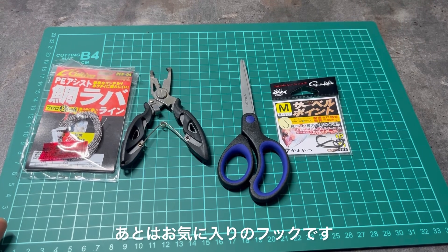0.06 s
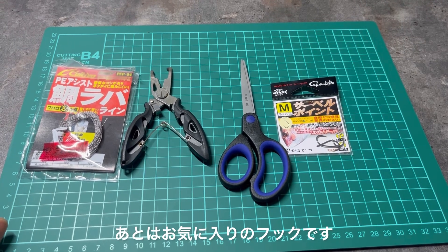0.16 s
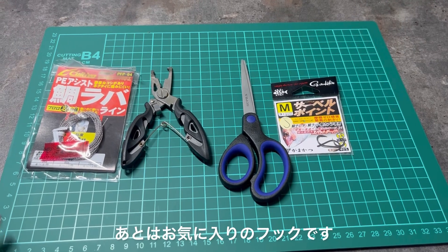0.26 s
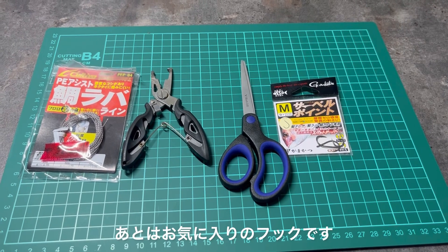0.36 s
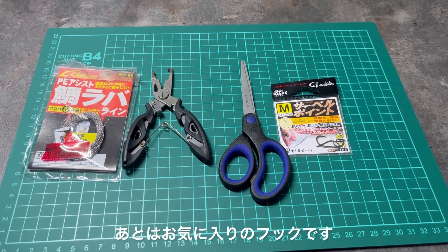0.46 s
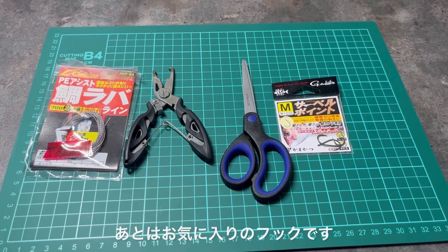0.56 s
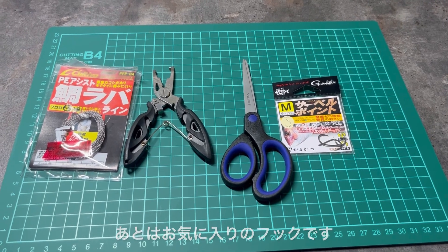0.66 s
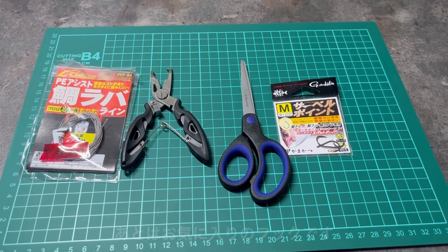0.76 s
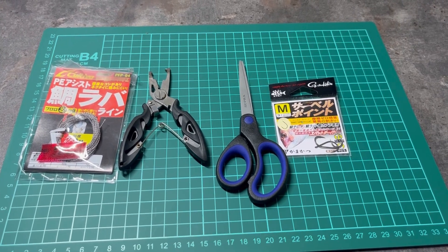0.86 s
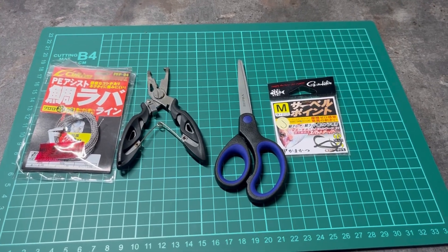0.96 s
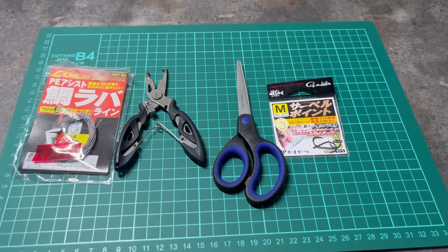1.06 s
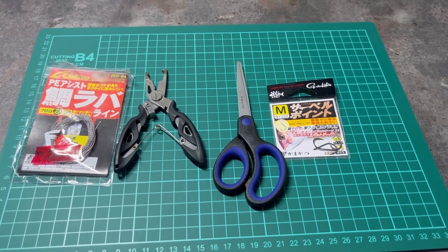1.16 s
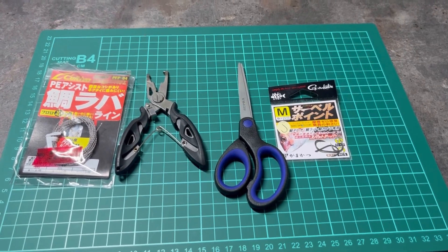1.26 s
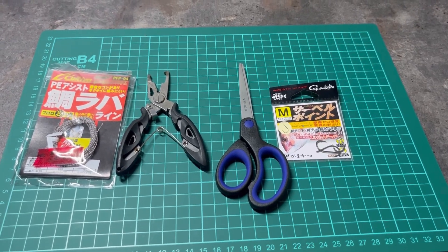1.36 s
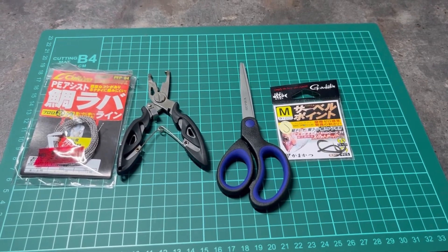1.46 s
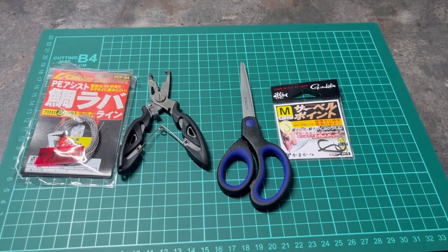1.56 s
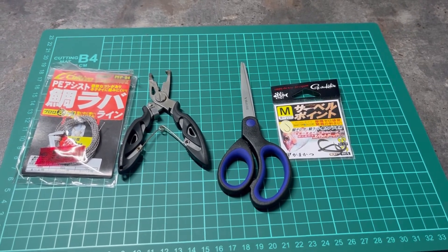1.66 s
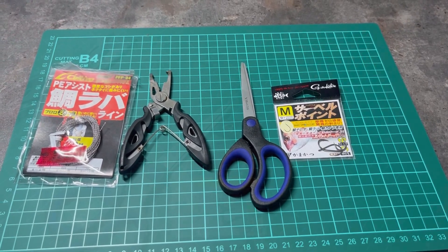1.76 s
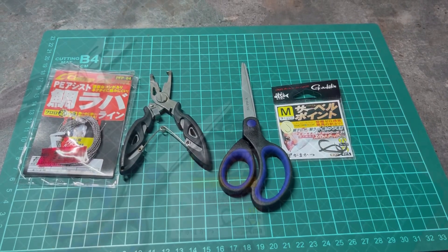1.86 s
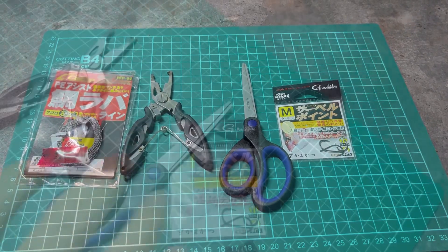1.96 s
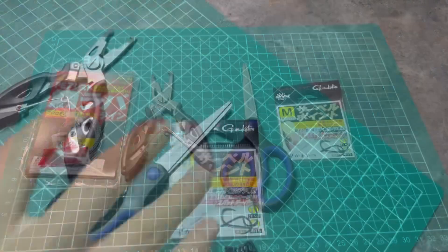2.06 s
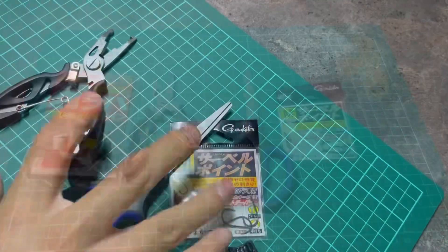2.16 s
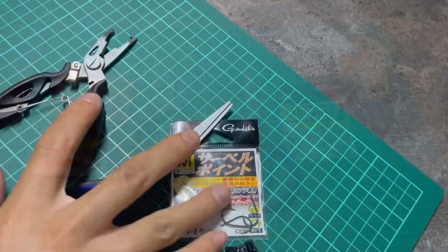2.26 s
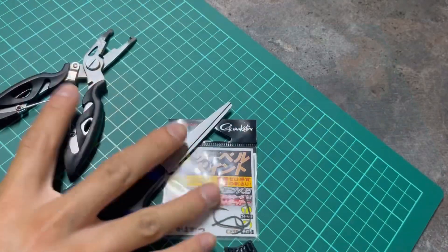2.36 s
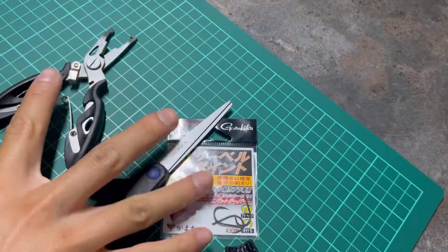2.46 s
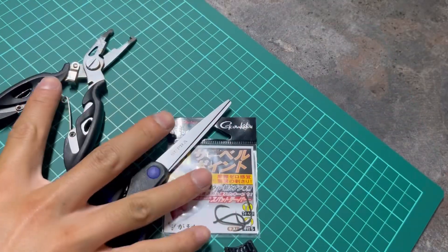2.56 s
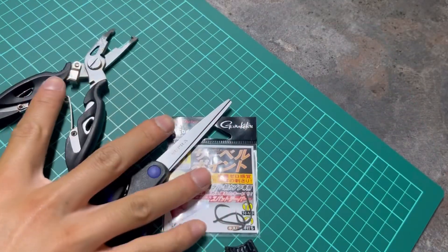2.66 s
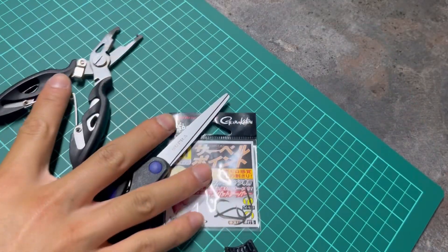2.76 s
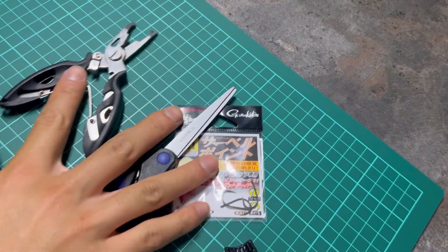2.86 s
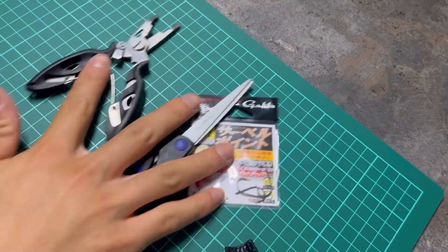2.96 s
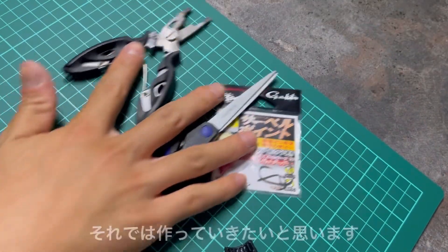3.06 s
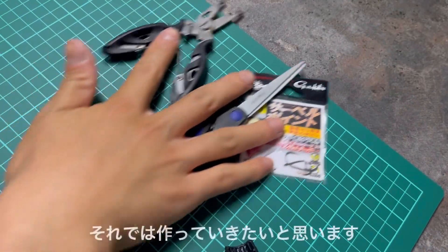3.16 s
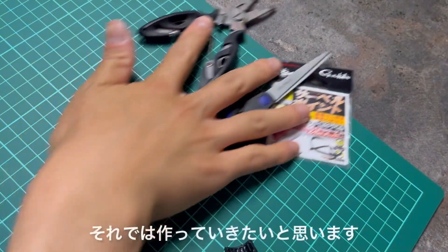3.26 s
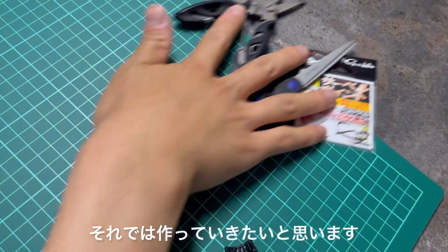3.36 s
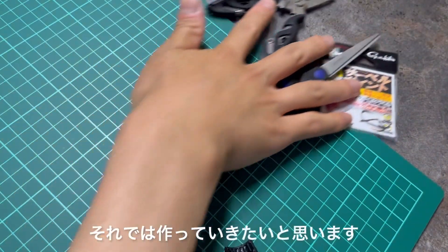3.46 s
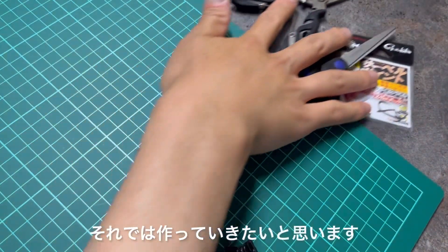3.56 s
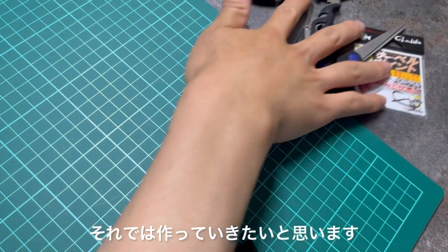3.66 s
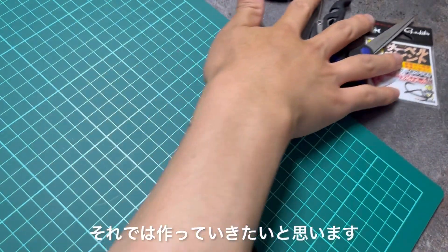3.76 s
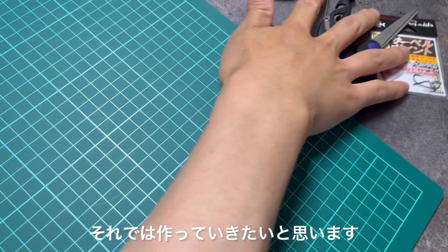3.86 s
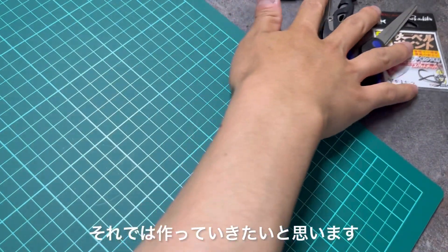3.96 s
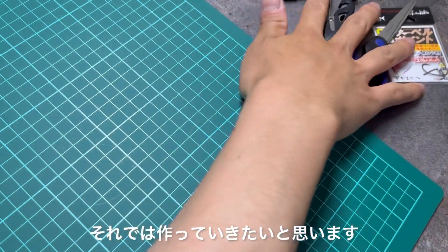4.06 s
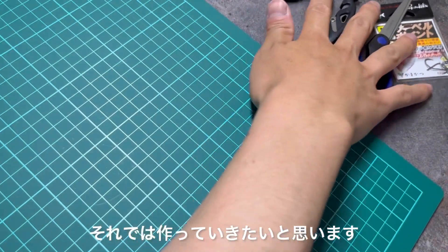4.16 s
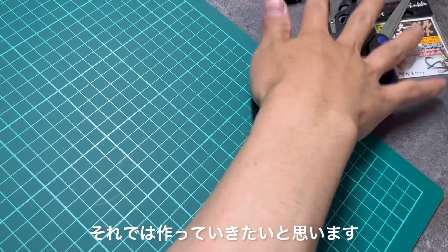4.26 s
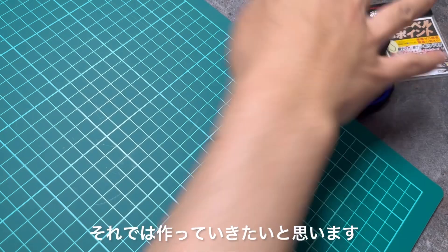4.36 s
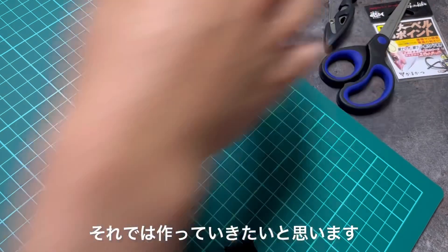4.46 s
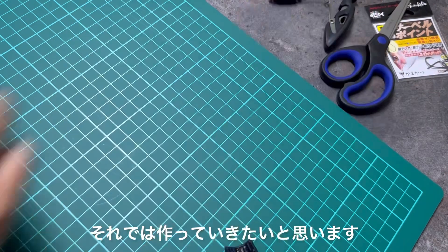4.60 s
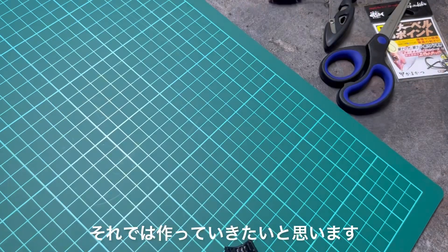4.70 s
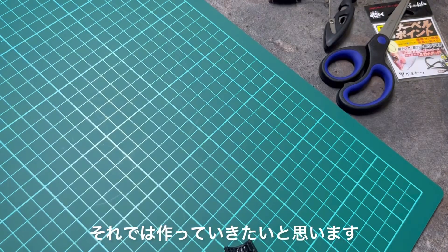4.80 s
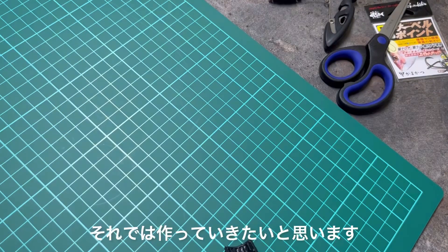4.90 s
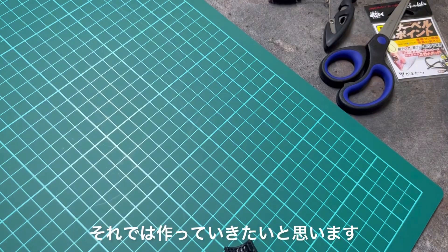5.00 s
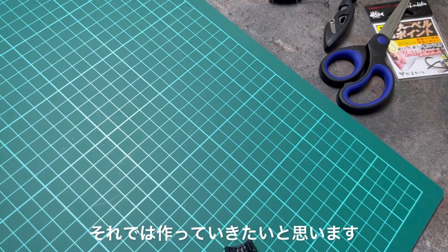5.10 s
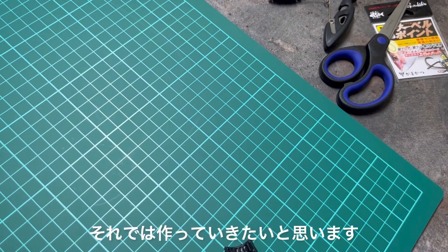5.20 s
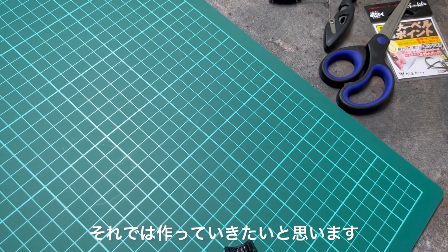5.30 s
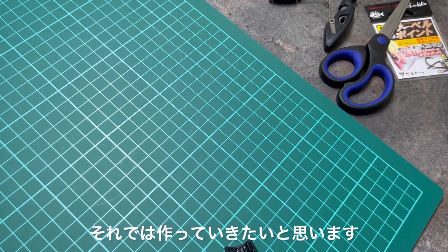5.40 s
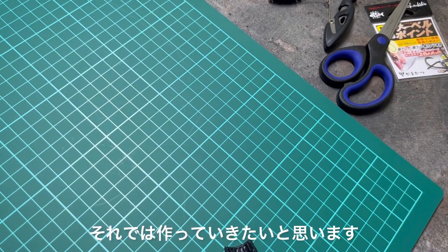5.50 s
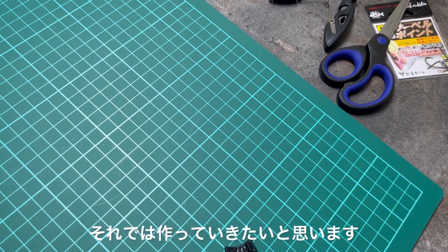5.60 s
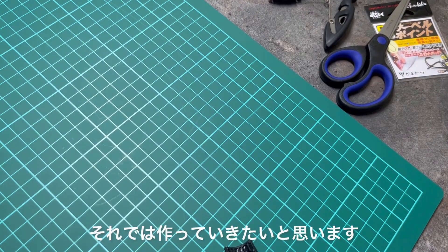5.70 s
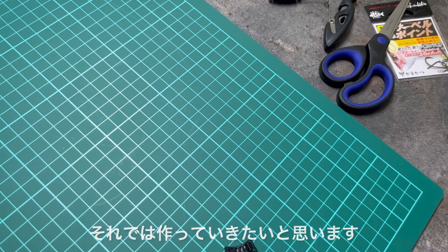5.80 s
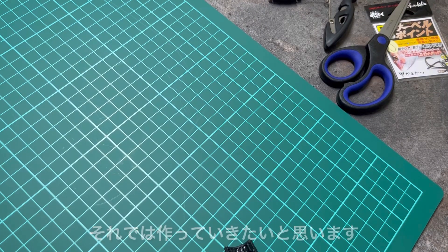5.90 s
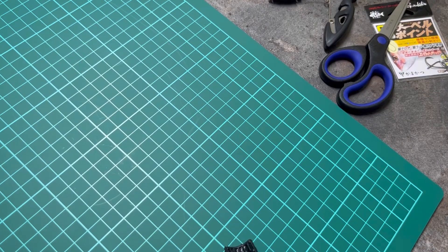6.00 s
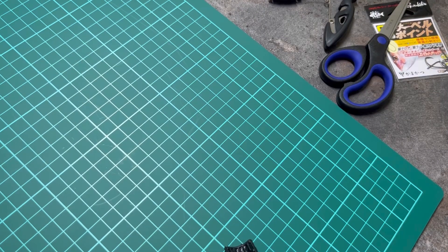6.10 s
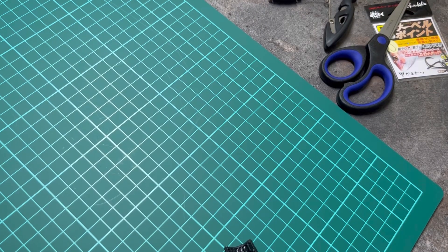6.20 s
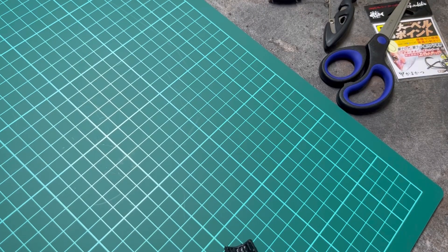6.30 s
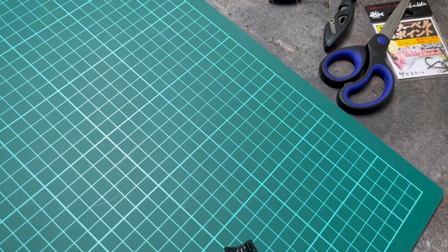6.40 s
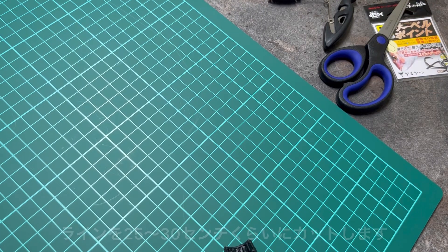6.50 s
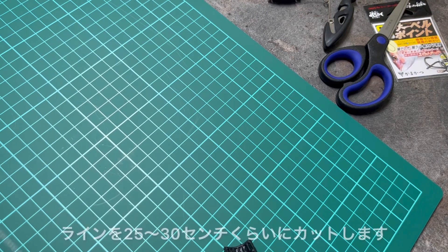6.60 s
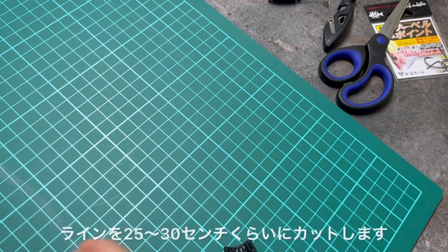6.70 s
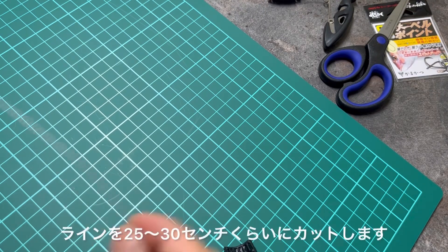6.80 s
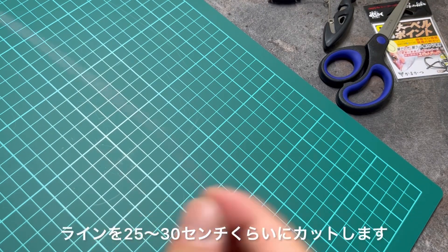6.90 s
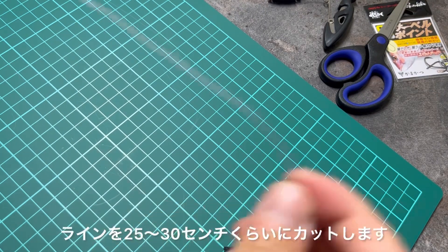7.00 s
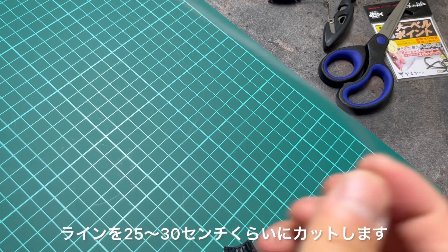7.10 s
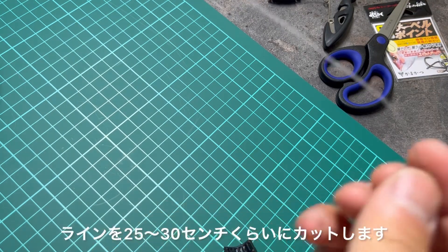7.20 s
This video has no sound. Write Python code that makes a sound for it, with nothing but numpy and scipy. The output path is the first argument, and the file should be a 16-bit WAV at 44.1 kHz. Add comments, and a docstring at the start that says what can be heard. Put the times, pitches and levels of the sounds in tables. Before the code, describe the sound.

A quiet room with faint low rumble and thin air, heard very close in stereo with only a small room tail. The first second is nearly still. From 1.0 to 1.8 s, plastic handles and packets are nudged on the mat: dull hollow knocks, strongest near 1.5, with short dry rubs. From 2.1 to 2.7 come lighter taps and scuffs, with a very soft low hum around 2.1. A slide swells from 2.75, with a knock at 3.15; at about 3.35 the tools tip over the mat edge and the hiss gives way to bright, rapid steel chatter and low table drumming, loudest to 3.8, fading by 4.0. At 4.15 a firm knock and brief scrape end the push. From 4.6 to 6.5, packets crinkle in irregular bursts with crisp ticks, strongest around 5.6 to 5.9, and soft thuds. Then almost only room tone remains to 7.25.

```python
"""Pliers, scissors and plastic packets on a cutting mat, above the rumble of a quiet room.
First they are nudged: friction noise with a grain of separate contacts, and knocks made of decaying tones.
Then a hand pushes all off onto the table top: the slide hisses, excites low table modes and rattles the steel.
Afterwards packets crinkle: bursts of film noise, short decaying sines and soft thuds.
Two close ports hear partly shared sound with a phase lead; a diffuse tail answers for the room."""
import sys
import numpy as np
from scipy import signal
from scipy.fft import rfft, irfft, next_fast_len
from scipy.io import wavfile
from scipy.ndimage import map_coordinates

SR = 44100
rng = np.random.default_rng(int(sys.argv[2]) if len(sys.argv) > 2 else 0)


def file_out(sig):
    """Save sig as 16-bit WAV at sys.argv[1]."""
    # one column per channel
    cols = np.atleast_2d(sig).T
    # limit, then scale
    lim = np.clip(cols, -1, 1)
    pcm = np.round(lim * 32767).astype(np.int16)
    wavfile.write(sys.argv[1], SR, pcm)


N = 319725

# Spectra give relative levels; mode widths and levels apply to one pass of the resonance.
# Event levels come before the gain of their layer.

# sliding speed as drag, weight on the table as drumming, push then last shove: time_s, drag_db, drum_db
PUSH_STROKES = [
    [(2.62, -99, -69.5), (2.754, -78.5, -50.5), (2.848, -66, -43), (3.024, -55, -44.5), (3.126, -55, -47),
     (3.164, -51.5, -26.5), (3.278, -54.5, -42.5), (3.33, -51, -43), (3.368, -49, -37),
     (3.448, -48.5, -29.5), (3.512, -41, -30.5), (3.6, -47.5, -26), (3.638, -44.5, -28),
     (3.706, -48, -27.5), (3.76, -46.5, -27), (3.87, -49.5, -32.5), (3.93, -59.5, -40), (4.05, -77, -58),
     (4.135, -79.5, -49.5)],
    [(4.15, -48.5, -34), (4.228, -70.5, -51), (4.268, -59, -39.5), (4.306, -62, -42.5), (4.336, -73, -46),
     (4.496, -102.5, -77.5), (4.55, -101, -77)],
]
# share of the slide on the bare table: time_s, share (0-1)
BARE_TABLE_SHARE = [(0, 0), (3.5, 0), (3.6, 1), (7.25, 1)]
# bands cancelled by the bare table's echo: centre_hz, width_hz, depth (0-1)
ECHO_DIPS = [(1710, 190, 0.6), (2780, 98, 1), (3560, 67, 0), (4870, 170, 0.81)]
# resonances of the table top: centre_hz, width_hz, level_db
TABLE_MODES = [(86, 100, -14.5), (132, 24, -6), (204, 28, -10), (262.2, 9.1, 2.5), (330.1, 8, 3),
               (372, 90, -10.5), (423, 23, -1), (486.3, 21, -5), (587, 55, -10.5), (652.5, 22, -6.5),
               (765, 64, -14), (1011, 67, -20)]
# resonances of rattling tools: centre_hz, width_hz, level_db
STEEL_MODES = [(3330, 190, -1.5), (4130, 730, -6), (5540, 1600, -12), (10770, 400, -21)]
# resonances of tools dragged flat, passed twice: centre_hz, width_hz, level_db
DRAG_MODES = [(2400, 1400, 4), (3350, 430, 5), (4100, 1000, -4), (5300, 170, -9)]
# spectrum of the mat hiss: frequency_hz, level_db
HISS_SPECTRUM = [(500, -9), (1500, 1.5), (3000, 3), (5000, 5.5), (7500, -0.5), (10500, -1), (13500, -0.5),
                 (14800, -17), (15600, -45)]
# spectrum of the grit under the slide: frequency_hz, level_db
GRIT_SPECTRUM = [(400, -16.5), (800, -3.5), (1300, 0), (1550, -4.5), (1800, -7), (2500, -48.5)]
# steel singing as it slides slowly: centre_hz, width_hz, level_db
SQUEAK_MODES = [(3320, 110, 0), (4200, 120, -7.5), (2510, 80, -7.5)]
# when the steel sings: peak_s, rise_s, hold_s, fall_s, level_db
SQUEAK_SWELLS = [(4.3, .09, .002, 0.15, -55.5), (6.62, .06, .06, .06, -81)]
# single slips of the steel: start_s, level_db, ring_hz, edge_db (edge relative to the slip)
STEEL_SLIPS = [(3.3438, -21.5, 3470, -33), (3.3527, -19, 3460, -31.5), (3.3604, -23.5, 3220, -30),
               (3.3824, -22.5, 3640, -40), (3.3973, -22, 3400, -34.5), (3.411, -22, 3480, -32.5),
               (3.4243, -13.5, 3510, -34), (3.4363, -14.5, 3490, -29.5), (3.442, -23.5, 3510, -29),
               (3.4504, -20, 3700, -29), (3.4605, -21, 3600, -32.5), (3.4693, -15.5, 3660, -32.5),
               (3.4757, -19, 4100, -33.5), (3.4844, -23.5, 3580, -33.5), (3.4925, -20.5, 3620, -32),
               (3.5019, -21.5, 3640, -36), (3.506, -21.5, 4080, -34), (3.5132, -22, 3580, -31),
               (3.5186, -25.5, 3470, -28.5), (3.5285, -26.5, 3700, -30), (3.5456, -24, 3680, -30.5),
               (3.5539, -23, 3740, -27.5), (3.5636, -28.5, 3300, -27), (3.5695, -26, 3700, -29.5),
               (3.6272, -26, 4300, -16), (3.6401, -25, 3750, -14.5), (3.698, -31, 3350, -28.5),
               (3.7537, -26.5, 3320, -13), (3.766, -23.5, 3330, -22), (3.8844, -29, 3400, -22.5)]
# tool tips rung by the chatter, passed twice: centre_hz, width_hz, level_db
TIP_MODES = [(3400, 350, -0.5), (4070, 260, -3), (5380, 230, -3.5)]

# contacts: start_s, level_db, ring_hz, table_db, crack_db (both relative to level), left_over_right_db
KNOCK_EVENTS = [(.316, -59.5, 587, 6, 4.5, 1), (0.992, -47.5, 766, -22, -30, 4),
                (1.037, -50, 680, -9, -34, 4), (1.106, -47.5, 500, -10, -21, -1),
                (1.171, -36.5, 516, -7.5, -32, 7), (1.217, -45, 630, -28, -30, 4),
                (1.429, -46.5, 550, -14, -21, -3), (1.454, -27, 554, -19, -46, 0.5),
                (1.496, -27, 520, -30, -34, -2), (1.579, -34.5, 485, -16, -38, -0.5),
                (1.719, -41, 454, -19, -24.5, 3.5), (1.75, -31, 705, -24, -30, 2),
                (1.779, -39, 1170, -29, -25, -8.5), (2.074, -51, 302, 5, -40, -0.5),
                (2.093, -50, 290, 1, -38, 4.5), (2.118, -52, 397, 10, -29, 6),
                (2.204, -35, 690, -14, -19, 1), (2.295, -55, 536, -20, -3.5, -0.5),
                (2.338, -49, 2730, -29, 5, 11.5), (2.365, -47, 470, -28, -1, -1),
                (2.379, -47, 3000, -20, 1.5, 1.5), (2.39, -43, 490, 1.5, -14, 1.5),
                (2.44, -46.5, 2200, -5, -1.5, 0), (2.531, -36.5, 715, 0.5, -4, 2.5),
                (2.658, -41, 1130, -12, -3.5, 0.5), (2.683, -45, 524, -1, -6.5, 3),
                (3.147, -23.5, 441, -0.5, -11, -3), (4.145, -24, 2290, -20, -7, -2.5),
                (4.149, -21.5, 1040, 3.5, -14, -3.5), (4.241, -33, 447, -16, -5.5, -3.5),
                (4.636, -36.5, 1034, -11, -1.5, 2.5), (4.799, -46, 1810, -3, -3, 3),
                (4.942, -47, 1420, -12, -9, 0.5), (5.101, -52.5, 398, -27, -8.5, 2),
                (5.223, -53.5, 450, -9, 4.5, 3), (5.336, -35.5, 1734, -25, -4.5, 6),
                (5.439, -46, 418, -1.5, 3, -3.5), (5.592, -46.5, 1540, -3, -8, 18),
                (5.604, -34, 1404, -20, -1.5, 1.5), (5.681, -36.5, 1850, -4.5, -4, 2),
                (5.694, -23.5, 3580, -49, -3.5, 5), (5.703, -28.5, 1330, -39, -11, 2),
                (5.717, -40, 1480, -34, -21, -12.5), (5.862, -58, 3800, -11, -5, 12),
                (5.909, -33, 1840, -10, 3.5, 2), (5.937, -42.5, 1900, -23, -4, 1.5),
                (5.959, -40, 428, -24, 2, -3.5), (6.164, -42.5, 1870, -33.5, -3, 5),
                (6.196, -42.5, 2170, -15, -2.5, 4.5), (6.239, -47.5, 2400, -17, -19, 15),
                (6.292, -46.5, 1740, -24, -9, .5), (6.334, -45.5, 393, -5.5, 3.5, 5.5),
                (6.393, -46, 1900, -23, -8, 6), (6.443, -33.5, 465, -18, -1.5, 2)]
# a hard edge meeting plastic: centre_hz, width_hz, level_db
CRACK_MODES = [(2550, 1100, -1.5)]
# its brightest part, passed twice: centre_hz, width_hz, level_db
TREBLE_MODES = [(10400, 6900, 4.5)]

# packets and sleeve moving: peak_s, rise_s, hold_s, fall_s, rustle_db, sheen_db, thud_db
PACKET_SWELLS = [(4.632, 0.053, 0.0018, 0.14, -50, -57.5, -53), (4.75, 0.29, .002, 0.16, -75.5, -93, -51),
                 (4.808, 0.2, .002, 0.17, -67, -83, -57), (4.94, 0.077, .01, 0.13, -73.5, -74, -73),
                 (5.01, .03, 0.0016, 0.045, -70, -70.5, -73), (5.11, .05, 0.074, 0.082, -76.5, -98, -74),
                 (5.222, .02, 0.0057, .1, -67.5, -60.5, -56), (5.345, .012, .002, .11, -56.5, -87, -45.5),
                 (5.36, .03, 1.16, 0.014, -71, -84, -64), (5.425, 0.032, .002, 0.18, -60, -75, -53.5),
                 (5.605, 0.043, .002, 0.081, -51, -59.5, -46), (5.68, 0.17, .002, .02, -58, -70, -58),
                 (5.722, 0.027, .002, 0.4, -55.5, -77, -56.5), (5.872, .08, .002, 0.037, -58.5, -58.5, -56),
                 (5.98, 0.21, .002, 0.31, -59, -60.5, -49), (6.12, 0.19, .01, 0.11, -65, -85, -78),
                 (6.235, 0.13, 0.0064, .04, -70, -86, -74), (6.295, 0.04, 0.0029, 0.035, -61, -76, -72),
                 (6.4, .08, 0.023, 0.065, -84, -94, -59), (6.45, 0.028, 0.0017, 0.036, -53.5, -68, -63),
                 (6.47, .02, .036, .008, -71, -87, -53.5), (6.552, 0.03, .002, 0.13, -74.5, -78.5, -64),
                 (6.86, .1, 0.15, 0.053, -89.5, -80.5, -82), (7.12, 0.14, .002, .3, -82, -80.5, -78)]
# spectrum of crinkling film: frequency_hz, level_db
FILM_SPECTRUM = [(400, -20.5), (800, -5), (1150, -8), (1500, 1), (1900, -2), (2700, -11.5), (3500, -8.5),
                 (4500, -11.5), (7500, -22), (9500, -67.5)]
# spectrum of its high sheen: frequency_hz, level_db
SHEEN_SPECTRUM = [(5000, 1), (7000, -15.5), (10000, 1), (13000, 0.5), (14500, -5), (15600, -39)]
# spectrum of the soft thuds: frequency_hz, level_db
THUD_SPECTRUM = [(21, -50), (35, -21), (65, 9.5), (141, -2.5), (202, -9.5), (451, -8), (700, -15.5),
                 (910, -51), (1540, -120)]

# things nudged on the mat: peak_s, rise_s, hold_s, fall_s, dull_db, bright_db
NUDGE_SWELLS = [(.326, 0.18, .002, .045, -78, -74), (.43, 0.13, .002, .03, -96, -85),
                (.99, .03, .15, .05, -75, -82), (1.176, 0.03, .002, .07, -45, -78),
                (1.222, 0.22, .002, .02, -74, -69), (1.435, 0.015, .002, 0.035, -52, -76),
                (1.458, 0.017, .002, 0.038, -42, -60.5), (1.512, 0.044, 0.028, 0.074, -38.5, -55.5),
                (1.631, .04, .002, .065, -48, -72.5), (1.756, 0.055, .002, .1, -47.5, -58.5),
                (1.786, 0.091, .002, .055, -63, -61), (2.11, .012, .09, .03, -65.5, -77),
                (2.204, 0.051, .002, .03, -50, -59), (2.31, 0.11, .02, .02, -70, -83),
                (2.373, 0.032, .07, .08, -55, -66.5), (2.545, 0.043, .01, .13, -49.5, -58.5),
                (2.66, .04, .002, .2, -72, -76)]
# spectrum of the dull rub: frequency_hz, level_db
DULL_SPECTRUM = [(150, -29), (230, 1), (350, -5), (500, 5), (620, 3.5), (760, 8), (950, -19.5),
                 (1200, -6.5), (1800, -54)]
# spectrum of the bright rub: frequency_hz, level_db
BRIGHT_SPECTRUM = [(900, 2), (1200, 10), (1550, 11.5), (1900, -0.5), (2500, -6.5), (3000, -17.5),
                   (4200, -14), (4750, -11), (5100, -16.5), (5700, -16), (6500, -42), (12000, -39),
                   (15500, -37.5)]
# a thin high band in the nudges, passed twice: centre_hz, width_hz, level_db
WHISTLE_MODES = [(5700, 570, 0)]

# low tones from the table: peak_s, rise_s, hold_s, fall_s, level_db, pitch_hz at the peak, sag_hz_per_s
DRONE_TONES = [(2.083, 0.019, 0.072, .05, -42, 143.3, 70), (2.1, 0.075, .2, 0.2, -59, 73.2, 5.6),
               (2.378, 0.016, .002, 0.11, -60, 155, 5)]

# decay of the room's answer: frequency_hz, t60_s
WALL_DECAY = [(100, 0.18), (1000, 0.061), (10000, 0.44)]
# rumble of the room: time_s, level_db
RUMBLE_LEVEL = [(0, -69.5), (.5, -69.5), (1, -69), (1.66, -64.5), (1.9, -73), (2.05, -104), (2.3, -103),
                (2.56, -53), (2.73, -71), (3.2, -65), (3.55, -59), (4.3, -59), (4.5, -65.5), (5.05, -71),
                (5.57, -59), (6.05, -84), (6.44, -72.5), (7.25, -67.5)]
# spectrum of the rumble: frequency_hz, level_db
RUMBLE_SPECTRUM = [(12, -57.5), (20, -26.5), (59, -3), (77, -3.5), (97, -14), (211, -24), (250, -31),
                   (320, -58), (550, -120)]
# faint air: time_s, level_db
AIR_LEVEL_CURVE = [(0, -76.5), (.9, -76.5), (1.85, -83), (1.95, -83), (2.1, -80.5), (2.4, -74), (4.4, -73),
                   (6.5, -76), (7.25, -78.5)]
# spectrum of the air: frequency_hz, level_db
AIR_SPECTRUM = [(71, -34.5), (120, -6), (238, -3), (292, -5.5), (504, -10), (616, -13.5), (1530, -18),
                (1690, -21), (15000, -39)]

# power shared by the two ports: frequency_hz, likeness (0-1)
PORT_LIKENESS = [(40, 1), (200, 0.84), (400, .88), (700, 0.5), (1400, 0.66), (2800, 0.38), (5500, 1),
                 (8000, 0.89), (10000, 0.9), (14000, 1)]
# phase by which the left port leads: frequency_hz, lead_rad
PORT_LEAD = [(300, 0.5), (700, 1.5), (1400, 1.97), (2200, .5), (4700, 1.07), (6300, 1.42), (7700, -13.5),
             (8500, 4), (9400, 0.5), (10600, 7.5), (13400, 6), (15000, 17)]

# the tools tip over the edge of the mat: when, and how long it takes
EDGE_S, TIP_S = 3.335, .03
# hiss over the drag; loss past the edge; further fading as the things leave the mat
HISS_DB, HISS_LOSS_DB, HISS_FADE_DB_PER_S = 3.5, 24, 6
# steel over the drag; gain past the edge; extra at first, dying in the calming time
STEEL_DB, CHATTER_DB, KICK_DB, CALM_S = -5, 6, 5, 0.31
# grit over the drag; boom over the drumming; boom gain past the edge
GRIT_DB, BOOM_DB, BOOM_GAIN_DB = 8.5, -21, 8.5
FINE_DB = 1.5  # unevenness of a flat drag
UPPER_HZ, UPPER_DB = 5550, -16.5  # a higher mode that every slip rings too
# small slips in a row: rate, uneven spacing (share), level over the steel
CHATTER_PER_S, CHATTER_SCATTER, CHATTER_TICK_DB = 115, .3, -1
# of every knock: longest ring; treble and rustling tail under the crack
RING_T60_S, TREBLE_DB, TAIL_DB = 0.037, -12, -14
ONSET_CYCLES = 0.51  # time constant of a ring's build-up, in cycles
# harder knocks are duller: treble lost for each dB over a usual knock
TREBLE_PER_DB, USUAL_DB = 0.52, -44
WHISTLE_DB, WHISTLE_GROWS = -55.5, .6  # its gain; exponent: it grows slower than the dull rub
OVERTONE = 0.087  # second harmonic over the tone
BIGGEST = 3  # largest grain, in steps of the usual spread
FADE_DB = 30  # a swell climbs this far in its rise time and sinks this far in its fall time
DIP_S, DIP_LENGTH_S, DIP_DB = 6.508, .014, 14  # the level dips briefly
TOP_HZ = 15790  # upper band limit


def push():
    """Sliding friction: drag feeds hiss, grit and steel, weight drives the table modes, single slips ring."""
    drag, drum = played(PUSH_STROKES)
    since = np.arange(N) / SR - EDGE_S
    past = np.clip(since / TIP_S, 0, 1)
    hiss = drag * amp(HISS_DB - past * (HISS_LOSS_DB + HISS_FADE_DB_PER_S * since))
    grit = drag * amp(GRIT_DB)
    kick_db = KICK_DB * np.exp(-(since / CALM_S) ** 2)
    steel = drag * amp(STEEL_DB + past * (CHATTER_DB + kick_db))
    boom = drum * amp(BOOM_DB + BOOM_GAIN_DB * past)

    slide = boom * rubbing(twice(TABLE_MODES[:2]), 0.61, 27, grain_db=-7, per_s=180)
    slide += drum * rubbing(modes(TABLE_MODES[2:]), 3.3, 60, grain_db=-5.5, per_s=130)
    slide += hiss * rubbing(colour(HISS_SPECTRUM), 1.8, 200, grain_db=-2.5, per_s=990)
    slide += steel * rubbing(modes(STEEL_MODES), 2.5, 200, grain_db=-6.5, per_s=150)
    slide += grit * rubbing(colour(GRIT_SPECTRUM), 3.0, 150, grain_db=-7, per_s=250)
    slide += amp(6) * drag * rubbing(twice(DRAG_MODES), FINE_DB, 150, grain_db=-8.5, per_s=320)
    slide += swells(SQUEAK_SWELLS)[0] * rubbing(modes(SQUEAK_MODES), 4.1, 90, grain_db=1, per_s=81)
    slide += amp(CHATTER_TICK_DB) * past * steel * chatter()
    slide += steel_slips()

    bare = curves(BARE_TABLE_SHARE)[0]
    return (1 - bare) * slide + bare * filtered(slide, echo_dips)


def steel_slips():
    """Stick-slip: each release of the steel excites two decaying sines and a noisy edge."""
    slips = np.zeros(N + SR)
    t = np.arange(SR // 50) / SR
    for s, db, hz, edge_db in STEEL_SLIPS:
        fade = amp(-60 * t / 0.009) * (1 - np.exp(-t / 0.00043)) ** 2
        upper = amp(UPPER_DB) * np.sin(2 * np.pi * UPPER_HZ * t)
        ring = fade * (np.sin(2 * np.pi * hz * t) + upper)
        edge = amp(edge_db - 60 * t / 0.007) * rng.standard_normal(len(t))
        slips[round(s * SR):][:len(t)] += amp(db + 6.5) * (ring + edge)
    return filtered(slips[:N], ports)


def chatter():
    """Repeated stick-slip: nearly regular impulses of uneven size ring the resonances of the tool tips."""
    gap, size = rng.standard_normal((int(N / SR * 200), 2)).T
    spacing = np.clip(1 + CHATTER_SCATTER * gap, .2, 3)
    at = (np.cumsum(spacing) / CHATTER_PER_S * SR).astype(int)
    ticks = np.bincount(at, amp(3.4 * size), N)[:N]
    return unit(filtered(ticks, lambda f: twice(TIP_MODES)(f) ** 1 * ports(f)))


def echo_dips(f):
    """Interference: the bare table's echo cancels bands, here as Gaussian notches."""
    notches = [1 - np.clip(d, 0, 1) * np.exp(-((f - c) / w) ** 2) for c, w, d in ECHO_DIPS]
    return np.prod(notches, axis=0)


def knocks():
    """Impact: each contact gives a damped ring, a crack, a rustle of film settling and a blow to the table."""
    rings, cracks, trebles = np.zeros((3, 2, N + SR))
    tails, blows = np.zeros((2, N + SR))
    t = np.arange(SR // 4) / SR
    for s, db, hz, table_db, crack_db, pan_db in KNOCK_EVENTS:
        at = slice(round(s * SR), round(s * SR) + len(t))
        sides = amp(db + pan_db / 2 * np.array([[1], [-1]]))
        # plastic loses its ring within a few dozen cycles
        life = np.clip(RING_T60_S, .004, 36 / hz)
        fade = amp(-60 * t / life) * (1 - np.exp(-t * hz / ONSET_CYCLES))
        tones = np.sin(2 * np.pi * hz * t) + 0.48 * np.sin(2 * np.pi * hz * 0.85 * t)
        rings[:, at] += sides * amp(-5) * fade * tones
        # one sharp impulse, then a few milliseconds of grit
        snap = (t == 0) + .4 * amp(-60 * t / .006) * rng.standard_normal(len(t))
        cracks[:, at] += sides * amp(crack_db + 13) * snap
        treble_db = crack_db + TREBLE_DB - TREBLE_PER_DB * (db - USUAL_DB)
        trebles[:, at] += sides * amp(treble_db) * snap
        tails[at] += amp(db + crack_db + TAIL_DB - 60 * t / 0.11)
        roughness = 1 + 0.32 * rng.standard_normal(len(t))
        blows[at] += amp(db + table_db + 12.5 - 60 * t / 0.013) * roughness
    settle = tails[:N] * rubbing(colour(FILM_SPECTRUM), 2.5, 150, grain_db=-6, per_s=200)
    edges = filtered(cracks[:, :N], modes(CRACK_MODES)) + filtered(trebles[:, :N], twice(TREBLE_MODES))
    return filtered(rings[:, :N] + edges, ports) + filtered(blows[:N], modes(TABLE_MODES)) + settle


def packets():
    """Buckling film: creases snap amid friction noise, while the arm thuds softly on the table."""
    rustle, sheen, thud = swells(PACKET_SWELLS)
    film = rubbing(colour(FILM_SPECTRUM), 1.9, 120, grain_db=-3.0, per_s=87)
    film += amp(-6.5) * crackle(2470, cycles=4.0, count=1800)
    gloss = rubbing(colour(SHEEN_SPECTRUM), 2.8, 150, grain_db=-11, per_s=300)
    bumps = rubbing(colour(THUD_SPECTRUM), 0.53, 25, grain_db=-14.0, per_s=14)
    return rustle * film + amp(-0.5) * sheen * gloss + amp(-3.5) * thud * bumps


def crackle(hz, cycles, count):
    """Snap-through: each small crease is a damped sine with its own random pitch and size."""
    when, pitch, size = rng.random((count, 3)).T
    t = np.arange(256) / SR
    tone = (hz * 2 ** (1.8 * (pitch - .5)))[:, None]
    level = amp(-4 * np.log(size + 0.00057))[:, None]
    grains = level * np.sin(2 * np.pi * tone * t) * np.exp(-tone * t / cycles)
    at = (when * N).astype(int)[:, None] + np.arange(len(t))
    return unit(filtered(np.bincount(at.ravel(), grains.ravel(), N + len(t))[:N], ports))


def nudges():
    """Dry friction: short dull and bright rubs of plastic handles and packets on the mat."""
    dull, bright = swells(NUDGE_SWELLS)
    low = rubbing(colour(DULL_SPECTRUM), 2.3, 60, grain_db=-5.5, per_s=170)
    high = rubbing(colour(BRIGHT_SPECTRUM), 5.7, 120, grain_db=-13.0, per_s=270)
    whistle = rubbing(twice(WHISTLE_MODES), 1.8, 80, grain_db=-7, per_s=180)
    rubs = amp(-3.0) * dull * low + amp(4.0) * bright * high
    return rubs + amp(WHISTLE_DB) * dull ** WHISTLE_GROWS * whistle


def drone():
    """Gliding tone: low tones with a weak second harmonic swell briefly while their pitch sags linearly."""
    out = np.zeros(N)
    for s, rise, hold, fall, db, hz, sag in DRONE_TONES:
        t = np.arange(N) / SR - s
        phase = 2 * np.pi * (hz * t - sag * t * t / 2)
        swell = swells([(s, rise, hold, fall, db)])[0]
        out += swell * (np.sin(phase) + OVERTONE * np.sin(2 * phase))
    return np.sqrt(2) * out


def walls(x):
    """Reverberation: convolution with delayed noise in which each frequency dies at its own speed."""
    hz, t, z = signal.stft(rng.standard_normal((2, SR // 2)), SR, nperseg=256)
    decay = amp(-60 * t / along(WALL_DECAY, hz)[:, None])
    tail = signal.istft(z * decay, SR, nperseg=256)[1]
    delayed = np.pad(x, ((0, 0), (200, 0)))
    return signal.fftconvolve(delayed, tail / np.linalg.norm(tail[0]), axes=1)[:, :N]


def room_tone():
    """Background noise: low building rumble and faint air, each noise shaped by its spectrum."""
    rumble = rubbing(colour(RUMBLE_SPECTRUM), 0.79, 9.3, grain_db=-21, per_s=36)
    air = rubbing(colour(AIR_SPECTRUM), .8, 20, grain_db=-30, per_s=60)
    return amp(curves(RUMBLE_LEVEL)[0] + 1) * rumble + amp(curves(AIR_LEVEL_CURVE)[0]) * air


def rubbing(response, lumpy_db, rate, grain_db, per_s):
    """Stereo friction: lumpy noise plus separate grains of uneven size, partly shared by both ports."""
    lumps = amp(lumpy_db * wobble(rate) + lumpy_db / 2 * wobble(rate / 8))
    grains = np.zeros(N)
    hit = rng.random(N) < per_s / SR
    grains[hit] = amp(3.64 * np.minimum(rng.exponential(size=N)[hit], BIGGEST))
    # row 0 is common to both ports, rows 1 and 2 belong to one each
    force = rng.standard_normal((3, N)) * lumps
    force[0] += amp(grain_db) * unit(grains * np.sign(force[0]) * lumps) * np.std(force[0])
    m = next_fast_len(N + SR // 4)
    f, z = np.fft.rfftfreq(m, 1 / SR), rfft(force, m)
    share = np.clip(along(PORT_LIKENESS, f), 0, 1)
    pair = np.sqrt(share) * ports(f) * z[0] + np.sqrt(1 - share) * z[1:]
    return unit(irfft(pair * response(f), m)[:, :N])


def ports(f):
    """Phase difference: the two ports hear the table with half the lead on each side."""
    return np.exp(.5j * along(PORT_LEAD, f) * np.array([[1], [-1]]))


def modes(table):
    """Modal superposition: causal band-pass resonances summed with alternating sign."""
    def response(f):
        return sum((-1) ** k * amp(db) * 1j * f * w / (c * c - f * f + 1j * f * w)
                   for k, (c, w, db) in enumerate(table))
    return response


def twice(table):
    """Cascade: the modal response squared, for steeper skirts."""
    return lambda f: modes(table)(f) ** 2


def colour(points):
    """Spectral shaping: gain from a spectrum, shut below half its first frequency."""
    return lambda f: amp(along(points, f)) * (f > points[0][0] / 2)


def filtered(x, response):
    """Linear filtering: x times a complex response of frequency."""
    m = next_fast_len(N + SR // 2)
    return irfft(rfft(x, m) * response(np.fft.rfftfreq(m, 1 / SR)), m)[..., :N]


def swells(rows):
    """Power addition: every row rises, holds and falls in dB; one summed gain for each dB column."""
    s, rise, hold, fall, *cols = np.transpose(rows)[:, :, None]
    t = np.arange(0, N / SR + .001, .001)
    before = (s - t) / np.abs(rise)
    after = (t - s - np.abs(hold)) / np.abs(fall)
    away = np.maximum(np.maximum(before, after), 0)
    gains = [np.sqrt(np.sum(amp(c - FADE_DB * away) ** 2, axis=0)) for c in cols]
    return [np.interp(np.arange(N) / SR, t, gain) for gain in gains]


def played(tables):
    """Envelope: one gain per sample for each dB column, silent outside the tables."""
    return sum(gate(rows) * amp(curves(rows)) for rows in tables)


def gate(rows):
    """Gating: 1 while the table lasts, with short fades."""
    t0, t1 = rows[0][0], rows[-1][0]
    return np.interp(np.arange(N) / SR, [t0 - .004, t0, t1, t1 + .008], [0, 1, 1, 0])


def curves(rows):
    """Interpolation: one value per sample for each column after the time."""
    s, *cols = np.transpose(rows)
    return [np.interp(np.arange(N) / SR, s, c) for c in cols]


def wobble(rate):
    """Slow modulation: a smooth random curve with rate knots a second."""
    knots = rng.standard_normal(int(N * rate / SR) + 4)
    coarse = map_coordinates(knots, [np.arange(0, N + 16, 16) * rate / SR])
    return np.interp(np.arange(N) / 16, np.arange(len(coarse)), coarse)


def along(points, hz):
    """Logarithmic frequency: (Hz, value) points joined on a log axis."""
    f, v = np.transpose(points)
    return np.interp(np.log(hz + 1), np.log(f + 1), v)


def unit(x):
    """Normalisation: x at rms 1."""
    return x / np.sqrt(np.mean(x ** 2) + 1e-20)


def amp(db):
    """Decibel law: amplitude gain of a dB value."""
    return 10 ** (np.asarray(db) / 20)


def scene():
    """Superposition: all sources at the table, their reverberation and the room tone."""
    hits = knocks()
    things = push() + packets() + nudges() + drone()
    return things + hits + amp(-7.0) * walls(hits) + amp(-10.0) * walls(things) + room_tone()


def record(dry):
    """Band limitation: the level dips briefly once, and nothing passes above the upper limit."""
    since = np.arange(N) / SR - DIP_S
    depth = np.interp(since, [-.001, 0, DIP_LENGTH_S, 2 * DIP_LENGTH_S], [0, 1, 1, 0])
    return filtered(dry * amp(-DIP_DB * depth), lambda hz: hz < TOP_HZ)


dry = scene()
out = record(dry)
file_out(out)
```